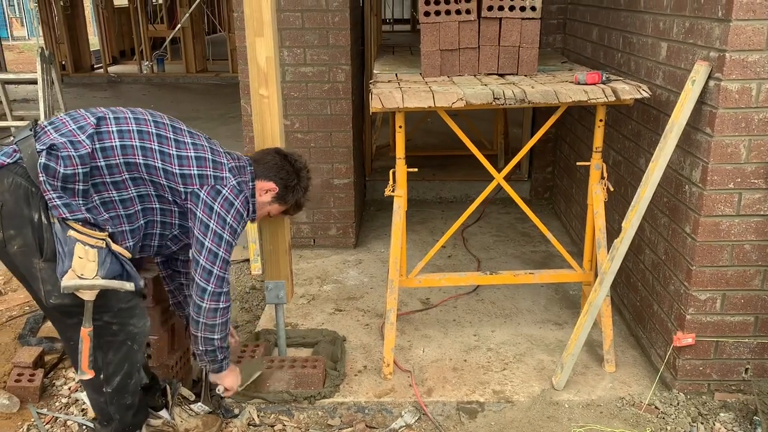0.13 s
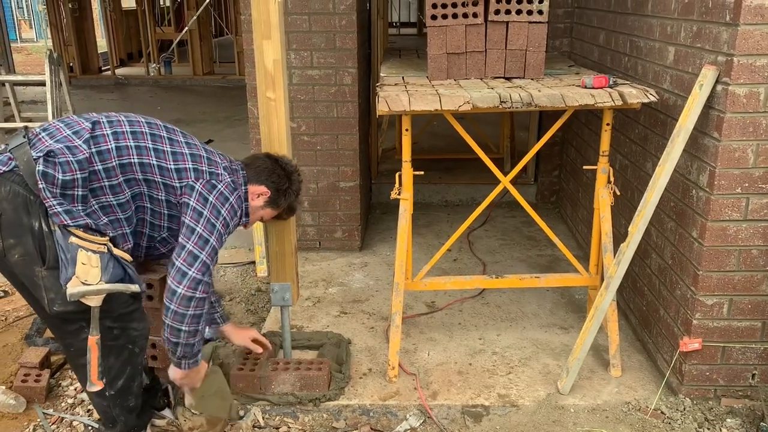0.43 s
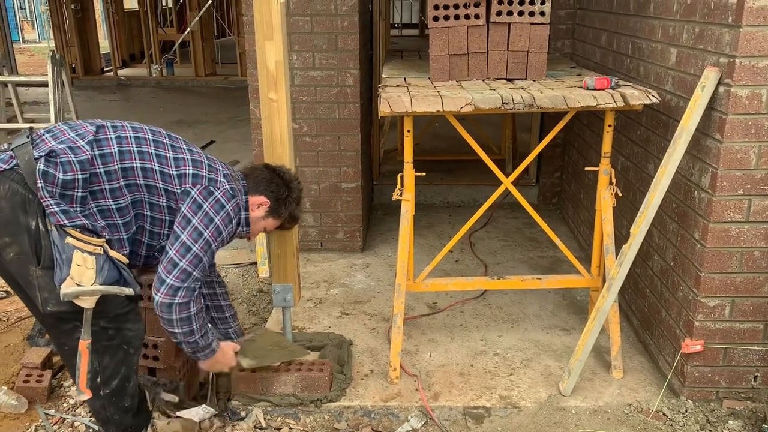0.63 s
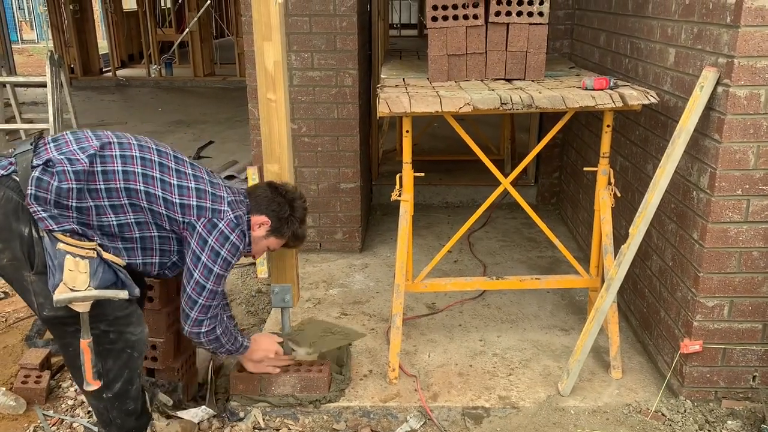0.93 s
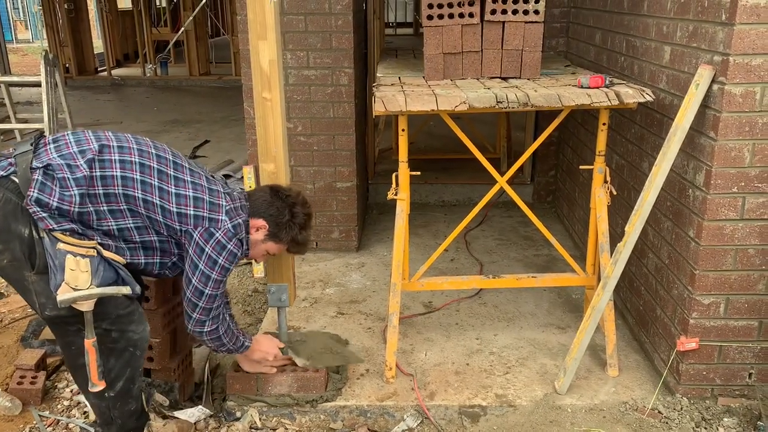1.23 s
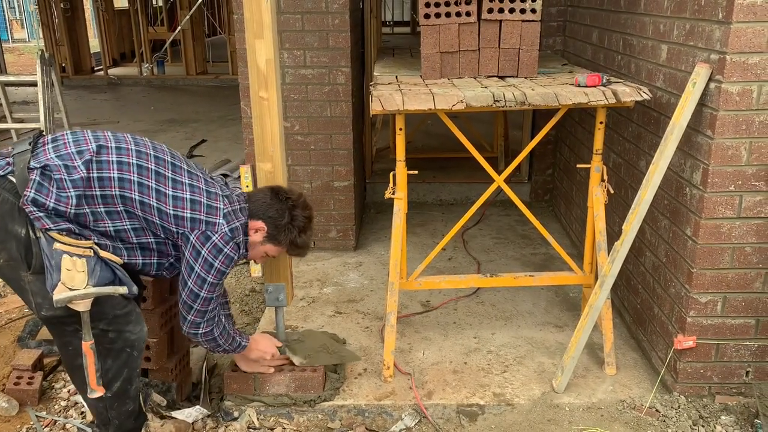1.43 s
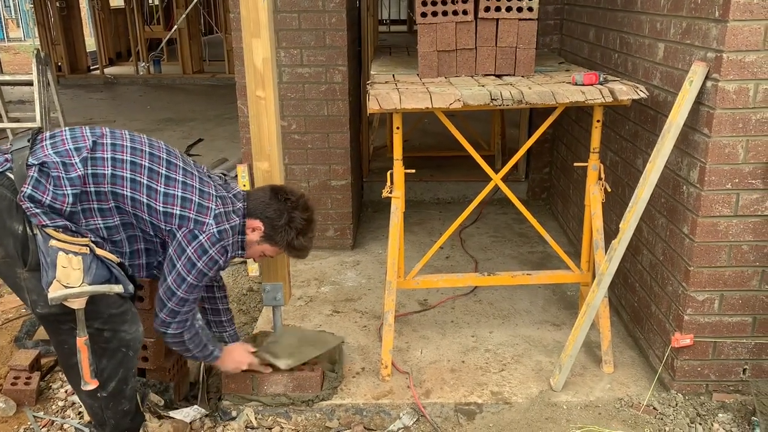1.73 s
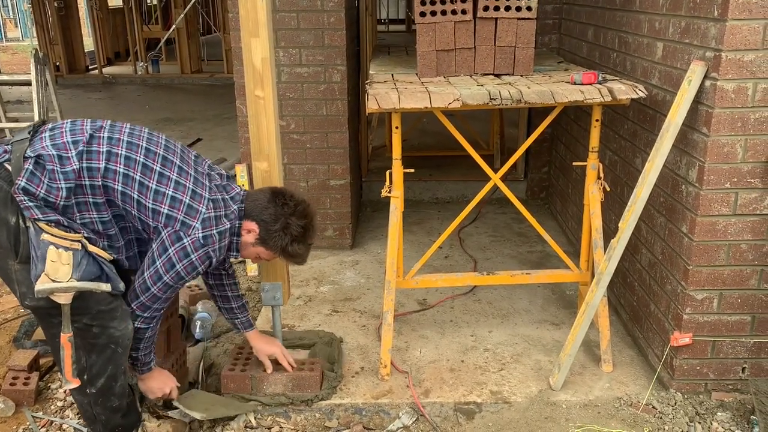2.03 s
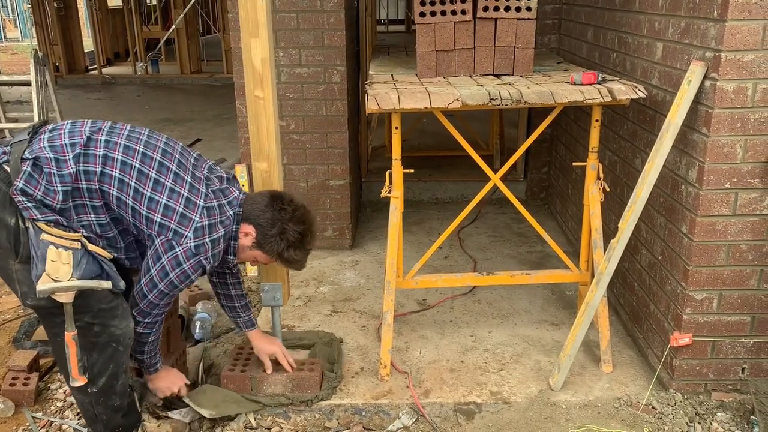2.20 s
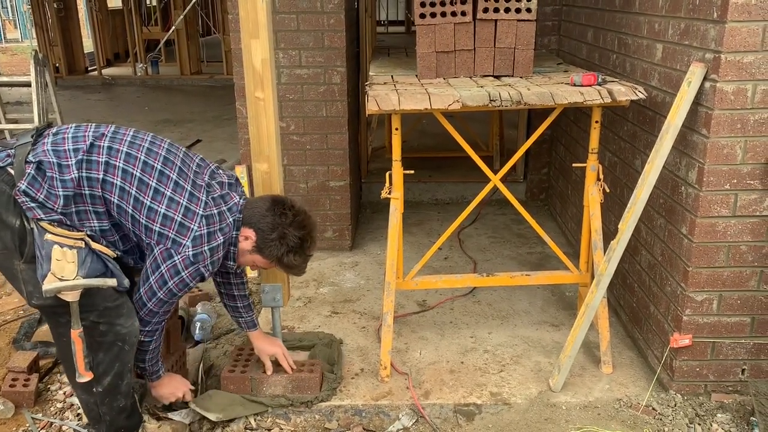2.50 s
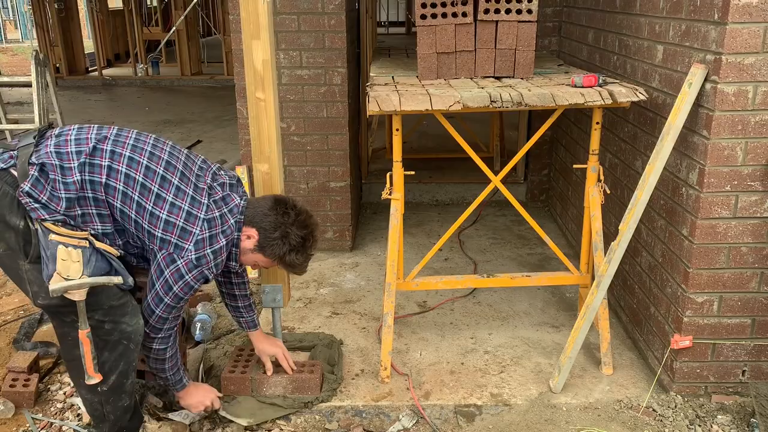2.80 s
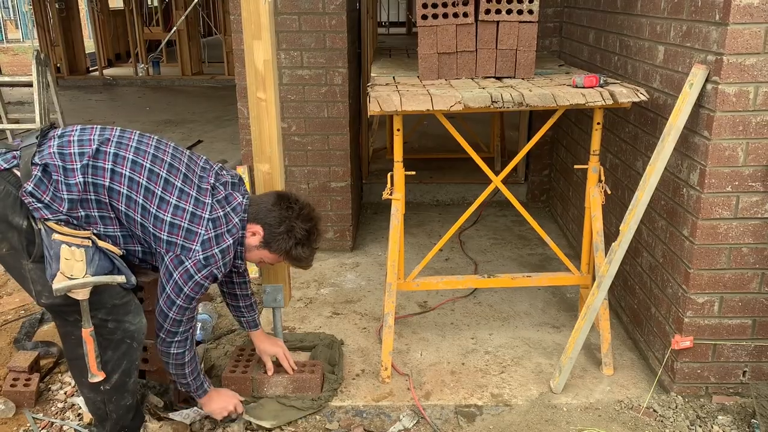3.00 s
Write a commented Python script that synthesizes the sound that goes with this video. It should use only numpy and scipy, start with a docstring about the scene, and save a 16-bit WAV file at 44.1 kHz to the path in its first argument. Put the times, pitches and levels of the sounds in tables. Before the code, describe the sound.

A bricklayer's steel trowel drags grittily through mortar, pauses, gives one soft and three sharp taps on a brick, then scrapes mortar away in short strokes; close stereo, brick porch, low site rumble behind.

```python
"""Trowel and brick

A steel trowel drags through mortar, taps a brick four times, the first softest, then scrapes mortar away.
Random sand grains shake a bank of blade modes and coloured noise; each tap is a clack, thud, click and ring.
Early echoes and short tails form the brick porch around the work.
Behind it, coloured noise makes the building site's rumble and a thin hiss that comes and goes."""
import sys
import numpy as np
from scipy import signal
from scipy.fft import rfft, irfft
from scipy.io import wavfile

SR = 44100
rng = np.random.default_rng(int(sys.argv[2]) if len(sys.argv) > 2 else 0)


def waveform_to_disk(signal):
    """Save audio, clipped to [-1, 1], as 16-bit WAV at the path in sys.argv[1]."""
    frames = np.transpose(np.atleast_2d(signal))
    scaled = np.clip(frames, -1, 1) * 32767
    samples = np.round(scaled).astype(np.int16)
    wavfile.write(sys.argv[1], SR, samples)


N = 138915  # samples


def amp(db):
    """Decibels to gain."""
    return 10 ** (np.asarray(db) / 20)


def unit(x):
    """Scales to rms 1."""
    return x / np.sqrt(np.mean(x ** 2) + 1e-20)


def read(points, hz):
    """Reads a table on a log-frequency axis."""
    f, value = np.transpose(points)
    return np.interp(np.log(hz + 1), np.log(f + 1), value)


def add(mix, s, sound):
    """Mixes a sound in at time s, trimmed to fit."""
    at = round(s * SR)
    sound = sound[max(-at, 0):]
    part = mix[max(at, 0):][:len(sound)]
    part += sound[:len(part)]


def through(x, response):
    """Plays x through an impulse response."""
    return signal.fftconvolve(x, response)[:N]


def colour(points, size=4096):
    """Minimum-phase impulse response of energy 1 with the given spectrum shape."""
    log_gain = np.log(amp(read(points, abs(np.fft.fftfreq(size, 1 / SR)))))
    spectrum = np.exp(np.conj(signal.hilbert(log_gain)))
    response = np.fft.ifft(spectrum).real[:size // 2]
    return response / np.linalg.norm(response)


def drift(seconds):
    """Smooth random curve of rms 1; longer seconds wander more slowly."""
    hz = np.fft.rfftfreq(N, 1 / SR)
    smoothing = (1 + (2 * hz * seconds) ** 2) ** 2
    return unit(irfft(rfft(rng.standard_normal(N)) / smoothing, N))


def lean(pair, points):
    """Pans each band left or right, keeping the mean power gain at 1."""
    side = read(points, np.fft.rfftfreq(N, 1 / SR))
    gains = amp([side / 2, -side / 2])
    return irfft(rfft(pair) * gains / np.sqrt((gains ** 2).mean(0)), N)


# spectrum of the site air: f/Hz, relative level/dB per Hz
SITE_COLOUR = [(15, -20), (30, -14), (52, 3.5), (70, -6), (130, -14), (200, -9.5), (280, -23), (370, -18.5),
               (520, -26), (750, -21.5), (1200, -36.5), (2200, -39.5), (3000, -55), (10000, -59)]
# what left and right share: f/Hz, correlation (0 to 1)
SITE_SAME = [(50, 0.89), (130, 0.49), (250, 0.18), (600, 0.032)]
# stereo balance of the site: f/Hz, left minus right level/dB
SITE_BALANCE = [(60, 1), (200, -0.5), (800, 9.5), (4000, 1.5)]
SITE_DB, SITE_FLUTTER_DB, SITE_FLUTTER_S = -49, 1.25, 0.02  # rms level, flutter depth and pace


def site():
    """Low rumble of distant machines under quiet outdoor air: partly shared stereo noise with a fast flutter."""
    hz = np.fft.rfftfreq(N, 1 / SR)
    a, b = rfft(rng.standard_normal((2, N)))
    same = np.clip(read(SITE_SAME, hz), 0, 1)
    right = same * a + np.sqrt(1 - same ** 2) * b
    air = irfft(np.array([a, right]) * amp(read(SITE_COLOUR, hz)), N)
    swell = amp(SITE_FLUTTER_DB * drift(SITE_FLUTTER_S))
    return amp(SITE_DB) * unit(lean(air, SITE_BALANCE) * swell)


# fader moves of the hiss, before flutter and left boost: t/s, narrow band level/dB, broad part level/dB
HISS_LEVEL = [(0, -57, -39.5), (.13, -67.5, -66), (0.499, -65, -63), (.59, -74.5, -79.5), (0.681, -88, -88),
              (1.101, -71, -74.5), (1.303, -76, -73), (1.449, -110, -93), (2.501, -85, -76),
              (2.652, -68, -66.5), (3.15, -64.5, -64)]
# narrow centre of the hiss: f/Hz, relative level/dB
HISS_BAND = [(3000, -38.5), (3650, 4.5), (3950, 19.5), (4150, 19.5), (4500, 1), (5200, -85)]
# broad part of the hiss: f/Hz, relative level/dB
HISS_BROAD = [(300, -11.5), (850, 9), (1300, -16), (1700, 11.5), (2300, 5.5), (2950, -4), (3800, 3.5),
              (5000, -2.5), (5700, 4), (7100, 11), (7900, -12.5), (9000, -58), (11000, -57.5)]
HISS_LEFT_DB = 5.5  # left channel louder than right


def hiss(flutter_db=1.0, flutter_s=0.0099):
    """A thin distant hiss, narrow and broad noise together, swells, flutters and fades."""
    s, band_db, broad_db = np.transpose(HISS_LEVEL)
    t, out = np.arange(N) / SR, np.zeros((2, N))
    for level_db, shape in ((band_db, HISS_BAND), (broad_db, HISS_BROAD)):
        noise = np.array([through(n, colour(shape)) for n in rng.standard_normal((2, N))])
        out += amp(np.interp(t, s, level_db)) * noise
    flutter = amp(flutter_db * drift(flutter_s))
    return out * flutter * amp([[HISS_LEFT_DB], [0]])


# stroke attack before the length-dependent part, its extra share of the length, and release time constant
STROKE_RISE_S, SWELL_SHARE, STROKE_FALL_S = 0.0012, 0.095, 0.0016


def pressure(start, length):
    """Force of one stroke: rise (slower for long strokes), hold, quick release."""
    t = np.arange(N) / SR - start
    rise = np.clip(t / (STROKE_RISE_S + SWELL_SHARE * length), 0, 1)
    return rise * np.exp(-np.maximum(t - length, 0) / STROKE_FALL_S)


GRAIN_SPREAD_DB, CATCH_DB, CATCH_S = 2.5, 2.5, 0.0056  # grain size spread; clumping depth and pace


def grains(per_s):
    """Sand grains of uneven size slipping in clumps: random signed clicks of overall rms 1."""
    size_db = GRAIN_SPREAD_DB * np.minimum(rng.exponential(1, N), 4)
    sizes = amp(size_db) * rng.choice([-1, 1], N)
    slips = rng.random(N) < per_s / SR
    return unit(sizes * slips * amp(CATCH_DB * drift(CATCH_S)))


# blade modes, before pitch, ring and choke are applied: f/Hz, relative level/dB, t60/s
BLADE = [(696, 2.5, 0.19), (830, -19, 0.066), (868, -11, 0.12), (977, -6, 0.19), (1178, -15, 0.15),
         (1232, -9, 0.18), (1476, -18.5, 0.14), (1615, -27, 0.15), (2232, -6.5, 0.077), (2505, -6, 0.072),
         (5370, -19, 0.27), (7000, -10, 0.087)]
CHOKE_S = .06  # the blade settles on the brick, which chokes its ring
FAVOUR_DB_PER_OCTAVE = 5.5  # modes far from the favoured pitch ring less


def blade(pitch=1, ring=1, favoured_hz=None):
    """Steel blade modes damped by wet mortar; the spot that is struck favours the modes near one pitch."""
    t = np.arange(SR // 4) / SR
    hz, db, t60 = np.transpose(BLADE)[:, :, None]
    if favoured_hz:
        db = db - FAVOUR_DB_PER_OCTAVE * abs(np.log2(hz / favoured_hz))
    decay = np.exp(-np.log(1000) * t / (t60 * ring))
    modes = amp(db) * decay * np.sin(2 * np.pi * hz * pitch * t)
    return modes.sum(0) * np.exp(-(t / CHOKE_S) ** 2)


# blade strokes through mortar: t/s, length/s, chatter level/dB, sand grit level/dB, wet slop level/dB
STROKES = [(-.004, 0.02, -36, -34, -51.5), (0.03, 0.016, -36, -38, -49), (0.057, 0.027, -48, -49.5, -47),
           (0.387, 0.13, -58, -70, -51.5), (0.455, 0.035, -46.5, -61, -48.5),
           (2.005, 0.0082, -54, -61.5, -58), (2.038, 0.065, -56.5, -63.5, -87),
           (2.124, 0.12, -52.5, -60.5, -69.5), (2.161, 0.033, -52.5, -63, -59.5),
           (2.21, 0.025, -55.5, -77, -69.5), (2.336, 0.014, -52, -65, -67), (2.477, 0.071, -49, -58, -66.5),
           (2.611, 0.019, -48, -50, -62), (2.637, 0.027, -47, -74, -56), (2.725, 0.15, -55.5, -68.5, -62),
           (2.861, 0.04, -53, -59.5, -61), (2.945, 0.0195, -50.5, -56.5, -66),
           (3.101, 0.029, -53, -54.5, -59.5)]
# the bare blade edge skids over concrete: t/s, length/s, level/dB
SKIDS = [(.0, 0.047, -47), (2.94, 0.016, -47), (2.954, 0.077, -63.5)]
# colour of the blade chatter: f/Hz, relative level/dB
CHATTER = [(60, -53.5), (220, -9), (420, -24.5), (520, -5.5), (650, 6.5), (820, 6), (980, 3.5), (1090, -33),
           (1230, 2), (1400, -18), (1650, -9.5), (1950, -19.5), (2300, -2), (2620, -11.5), (2850, -37),
           (3700, -16), (5000, -30), (9000, -62.5)]
# colour of the sand grit: f/Hz, relative level/dB
GRIT = [(800, -13), (2400, -10.5), (3600, -4.5), (4900, -12.5), (5500, -4), (6800, 2.5), (7500, 0.5),
        (8300, -9), (9200, -23), (11000, -81.5)]
# colour of the skidding edge: f/Hz, relative level/dB
SKID = [(1800, -20), (2300, -1), (2600, 0), (2900, -27), (4000, -24), (5100, -12), (5550, -6.5),
        (6100, -11.5), (6700, 1.5), (7250, -7), (7800, -10), (10000, -54)]
# colour of wet mortar: f/Hz, relative level/dB
SLOP = [(40, -17), (110, -8), (200, 2.5), (380, -0.5), (520, -7.5), (1200, -31.5), (9000, -96)]
FLEX_DELAY_S, FLEX_S = 0.001166, 0.0302  # the blade flexes, so its resonances wander: rms depth and pace
LUMP_DB, LUMP_S = 2.5, 0.011  # lumps in the mortar make the drag uneven: depth and pace
PRESSED_PITCH, PRESSED_RING = 1.206, 0.092  # factors on the mode pitches and t60s under load


def scrapes(sand_per_s=2000, stones_per_s=650, slop_per_s=900, skid_per_s=8000, pressed_db=-34):
    """Fine sand hisses, coarse grains catch and shake the flexing blade, wet mortar slops, the edge skids."""
    sand, stones, n = grains(sand_per_s), grains(stones_per_s), np.arange(N)
    power = sum((amp(levels_db)[:, None] * pressure(start, length)) ** 2
                for start, length, *levels_db in STROKES)
    chatter, grit, slop = np.sqrt(power)

    body = amp(pressed_db) * blade(PRESSED_PITCH, PRESSED_RING)
    add(body, 0, colour(CHATTER))
    lumps = unit(amp(LUMP_DB * drift(LUMP_S)))
    shaken = through(chatter * stones * lumps, body)
    # a wandering read position bends the pitch
    flexed = np.interp(n + FLEX_DELAY_S * SR * drift(FLEX_S), n, shaken)

    skid_force = sum(amp(db) * pressure(start, length) for start, length, db in SKIDS)
    skidding = through(skid_force * grains(skid_per_s), colour(SKID))
    gritty = through(grit * sand, colour(GRIT))
    wet = through(slop * grains(slop_per_s), colour(SLOP))
    return flexed + gritty + skidding + wet


# the edge judders on the brick: t/s, length/s, f/Hz before waver, level/dB before roughness
JUDDERS = [(0, 0.011, 799, -30), (0.055, 0.02, 838, -36.5), (2.494, .018, 2285, -50),
           (2.863, 0.03, 2520, -53), (2.876, .02, 679.4, -41.5)]


def judders(waver=0.0473, waver_s=0.001465, rough_db=3):
    """The edge sticks and slips in step with one bend of the blade: a short, rough squawk."""
    wavering_time = np.cumsum(1 + waver * drift(waver_s)) / SR
    rough = unit(amp(rough_db * drift(waver_s)))
    squawks = sum(amp(db) * pressure(start, length) * np.sin(2 * np.pi * hz * wavering_time)
                  for start, length, hz, db in JUDDERS)
    return rough * squawks


# soft bumps of hand and brick in the mortar bed: t/s, level/dB before the knock and push trims
BUMPS = [(.54, -15.5), (.935, -12), (1.026, -12), (1.65, -17.5), (1.727, -20), (1.945, -19)]
# colour of the dull brick thud, also under the taps: f/Hz, relative level/dB
THUD = [(30, -16), (110, -20.5), (175, 1.5), (230, 1), (330, -4.5), (600, -22.5), (2000, -47.5),
        (9000, -92)]


def bumps(hz=95, decay_s=0.033, knock_db=-8, push_db=-28):
    """A dull knock and a low push, a decaying sine, into the mortar bed."""
    out, knock = np.zeros(N), colour(THUD)
    t = np.arange(len(knock)) / SR
    push = np.sin(2 * np.pi * hz * t) * np.exp(-t / decay_s)
    bump = amp(knock_db) * knock + amp(push_db) * push
    for s, db in BUMPS:
        add(out, s, amp(db) * bump)
    return out


# colour of the clack: f/Hz, relative level/dB
CLACK = [(100, -30.5), (330, -12.5), (450, -7), (530, -7), (680, 5), (820, 5.5), (1050, -8.5), (1230, -5),
         (1370, -41), (1620, -5.5), (1900, -22), (2350, -11), (2600, -14.5), (2900, -33), (3600, -15),
         (5000, -65), (9000, -58.5)]
# colour of the steel click: f/Hz, relative level/dB
CLICK = [(800, 4), (2500, -28.5), (4500, -7.5), (5700, -8.5), (6400, 3.5), (7500, 0), (8300, -13.5),
         (9000, -27.5), (11000, -70)]
CLACK_DB, CLICK_DB = -5.5, -15  # layer trims, added to each event's level
RATTLE_S, RATTLE_DB = 0.0058, -4  # rattle decay constant; its level against the blow in the clack
CONTACT_S = 0.00078  # the blow peaks this long after the steel first touches


def contact(s, clack_db, click_db):
    """Steel meets brick: one blow and a brief rattle on the grit, heard as a clack and a click."""
    clack, click = np.zeros((2, N))
    t = np.arange(SR // 20) / SR
    rattle = rng.standard_normal(len(t)) * np.exp(-t / RATTLE_S)
    rattle /= np.linalg.norm(rattle)
    blow = (t == 0) + amp(RATTLE_DB) * rattle
    add(clack, s + CONTACT_S, amp(CLACK_DB + clack_db) * blow)
    add(click, s, amp(CLICK_DB + click_db) * rattle)
    return through(clack, colour(CLACK)) + through(click, colour(CLICK))


# trowel on brick, levels before the layer trims:
# t/s, clack level/dB, brick thud level/dB, steel click level/dB, blade ring level/dB, favoured f/Hz
TAPS = [(0.9659, -11, -4, -6.5, -14, 830), (1.144, 1.5, 3, 2.5, 2.5, 674),
        (1.3243, 2, 0.5, 3.5, -1.5, 2560), (1.4835, -1, 2.5, 3.5, -5.5, 1260)]
THUD_DB, RING_DB = -7, -32  # layer trims


def taps():
    """Each blow clacks, thuds in the brick and rings the blade."""
    out = np.zeros(N)
    for s, clack_db, thud_db, click_db, ring_db, favoured_hz in TAPS:
        out += contact(s, clack_db, click_db)
        add(out, s + CONTACT_S, amp(THUD_DB + thud_db) * colour(THUD))
        add(out, s, amp(RING_DB + ring_db) * blade(favoured_hz=favoured_hz))
    return out


# the blade nicks the brick while scraping, before trims: t/s, clack level/dB, steel click level/dB
NICKS = [(2.224, -22, -20), (2.343, -27, -27), (2.421, -21.5, -38), (2.572, -15, -16.5), (2.643, -12.5, -6),
         (2.678, -20, -37), (2.732, -13.5, -21), (2.763, -19.5, -17), (2.880, -16, -10.5),
         (3.082, -19, -14)]


def nicks():
    """The scraping blade, too damped to ring, nicks the brick."""
    return sum(contact(*row) for row in NICKS)


# stereo balance of the work: f/Hz, left minus right level/dB
WORK_BALANCE = [(100, 2), (200, 4.5), (320, 0), (550, 9.5), (900, 13.5), (1660, 9), (2900, 2), (5000, 3.5),
                (7000, -1), (8700, -9)]
# stereo phase of the work: f/Hz, left ahead of right/rad
PORT_PHASE = [(70, -0.5), (250, 3.5), (400, -1.7), (700, -1.4), (1300, -0.6), (2000, 3), (2600, -0.68),
              (3200, 1.97), (5000, 2.12), (6300, -2)]


def ports(pair):
    """The two microphone ports hear the work with different level and phase."""
    lead = read(PORT_PHASE, np.fft.rfftfreq(N, 1 / SR))
    left, right = lean(pair, WORK_BALANCE)
    return np.array([left, irfft(rfft(right) * np.exp(-1j * lead), N)])


# near reflections: delay t/s, left gain, right gain (negative is inverted)
ECHOES = [(.0031, -0.34, -0.078), (.0046, 0.38, -0.29), (.0078, -0.045, 0.047), (0.0107, -0.0017, 0.16),
          (0.027, -0.0029, -0.066), (.036, -0.05, 0.064)]
# decay of the porch tail: f/Hz, t60/s
PORCH_T60 = [(150, 0.061), (400, 0.17), (1000, 0.22), (2700, 0.18), (7000, 0.16)]
PORCH_DB, FAR_T60_S, FAR_DB = -3, 0.73, -17.5
BUILD_S = 0.0026  # both tails fade in over this time


def porch(x):
    """Direct sound, slab and wall reflections, a short porch tail and a faint one from inside the house."""
    hz, t, z = signal.stft(rng.standard_normal((2, SR // 2)), SR, nperseg=128)
    decay = np.exp(-np.log(1000) * t / read(PORCH_T60, hz)[:, None])
    near = signal.istft(z * decay, SR, nperseg=128)[1][:, :SR // 2]
    t = np.arange(SR // 2) / SR
    far = rng.standard_normal(near.shape) * np.exp(-np.log(1000) * t / FAR_T60_S)
    build = np.clip(t / BUILD_S, 0, 1)
    tails = amp(PORCH_DB) * unit(near * build) + amp(FAR_DB) * unit(far * build)
    room = tails / np.sqrt(len(t))
    for delay, left, right in [(0, 1.0, 1)] + ECHOES:  # the first entry is the direct sound
        add(room[0], delay, np.array([left]))
        add(room[1], delay, np.array([right]))
    return ports(np.array([through(x, side) for side in room]))


def scene():
    """Trowel work in front of the porch, over the site background."""
    work = scrapes() + judders() + bumps() + taps() + nicks()
    return site() + hiss() + porch(work)


EDGE_HZ = 11000  # top of the audible band


def record(dry):
    """A steep linear-phase low-pass takes off the treble above the band edge."""
    lowpass = signal.firwin(255, EDGE_HZ, window=("kaiser", 8), fs=SR)
    return signal.oaconvolve(dry, lowpass[None], "same")


dry = scene()
out = record(dry)
waveform_to_disk(out)
```